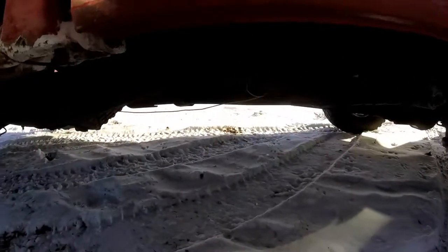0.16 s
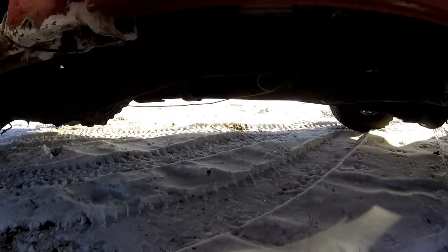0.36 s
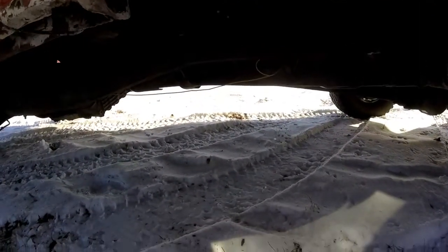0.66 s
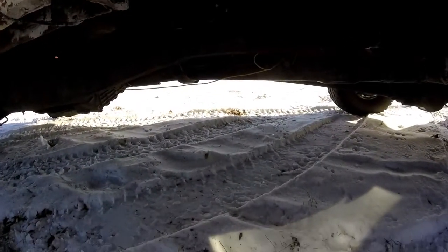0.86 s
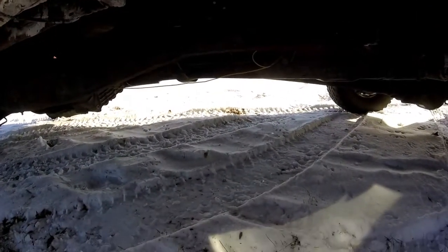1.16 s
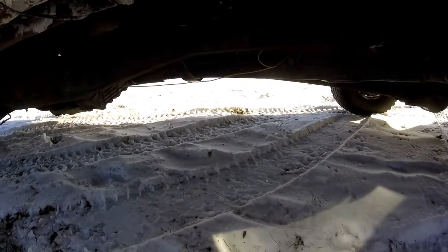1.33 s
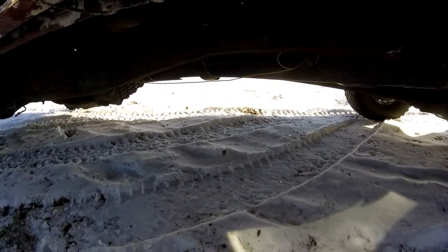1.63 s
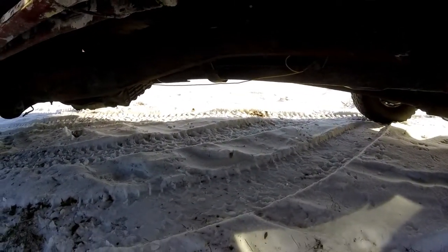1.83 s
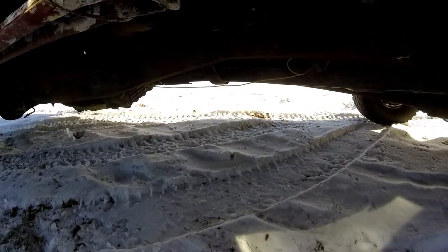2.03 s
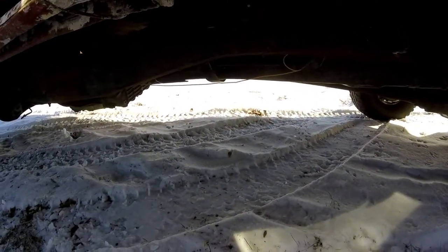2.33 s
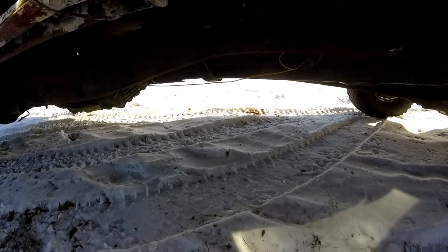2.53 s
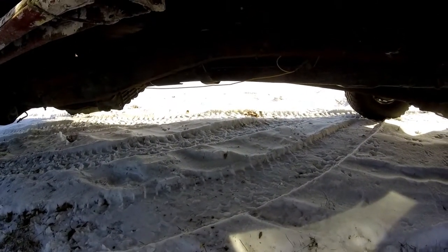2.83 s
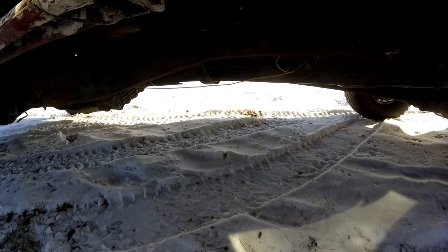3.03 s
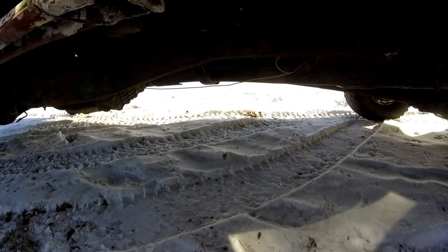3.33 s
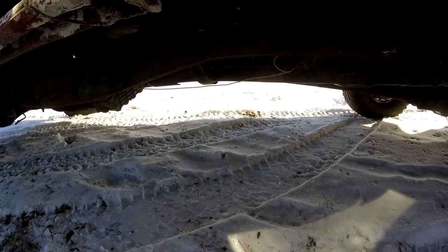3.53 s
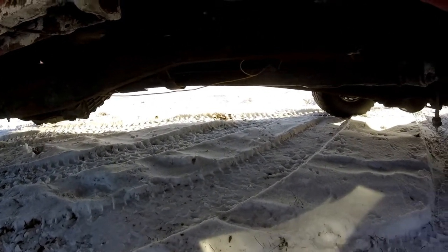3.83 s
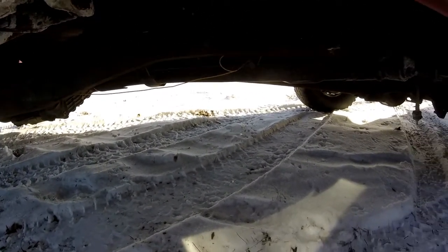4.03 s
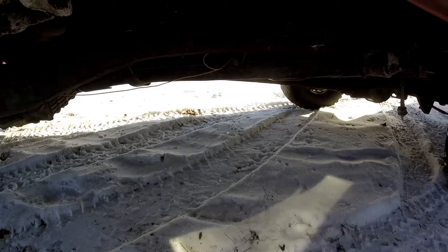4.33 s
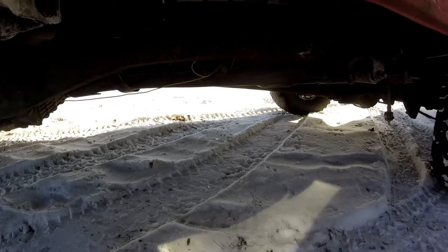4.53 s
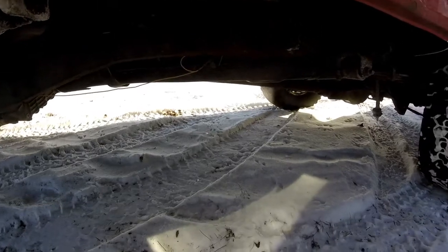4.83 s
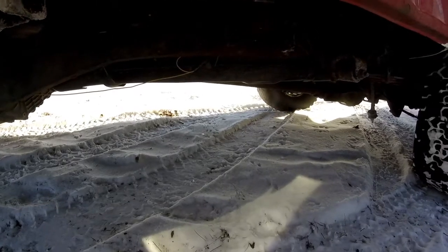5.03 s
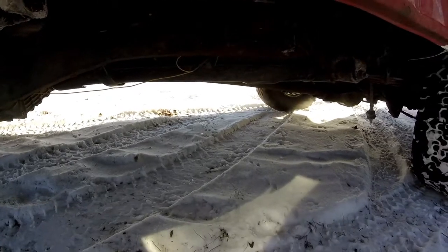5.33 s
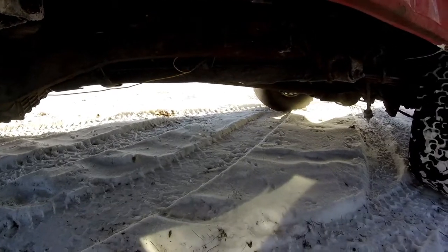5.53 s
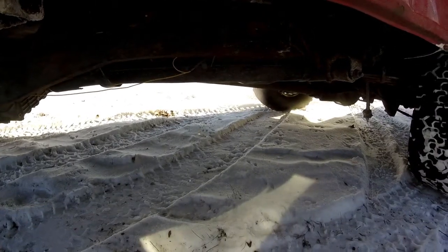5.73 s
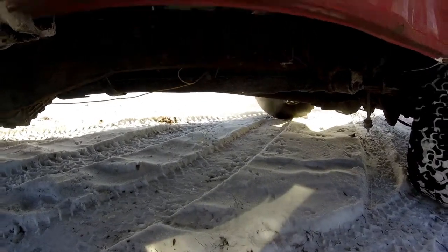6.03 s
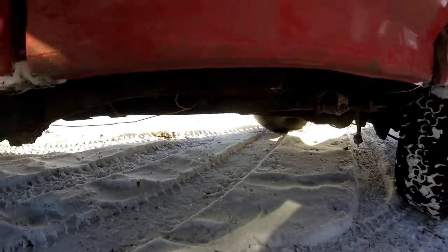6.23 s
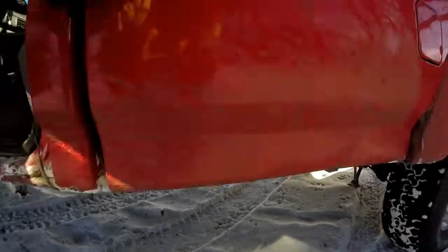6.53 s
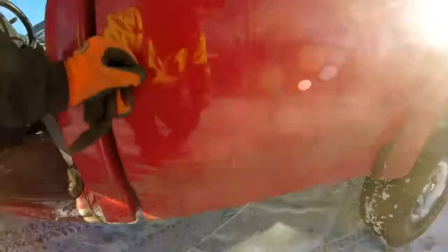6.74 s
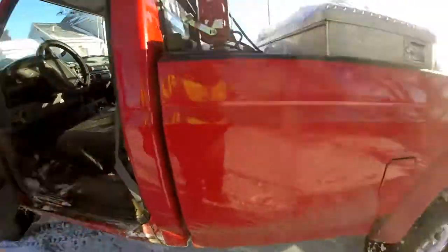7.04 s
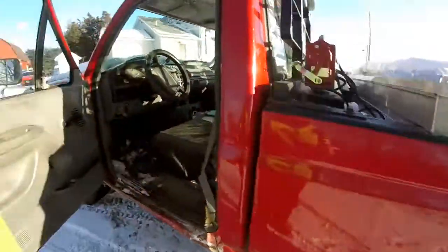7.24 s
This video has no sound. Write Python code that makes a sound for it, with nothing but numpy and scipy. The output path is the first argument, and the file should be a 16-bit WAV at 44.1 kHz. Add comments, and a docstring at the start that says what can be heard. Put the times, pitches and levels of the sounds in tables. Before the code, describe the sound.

Loud, unmuffled truck engine idling close by, starting quick and raspy, then easing into a deep, lumpy drone.

```python
"""A V8 pickup with open pipes idles on snow, heard from under its side. It starts at a fast idle: two
banks of cylinders puff unevenly into ringing pipes and gas rasps with each puff, over a hissing fan, a
whining alternator, a thin electric buzz and rattling metal. After a second the idle starts to settle.
Clothes scuff now and then, and snow squeaks, mostly between four and five seconds. Near the end the
microphone rises past the body panel, which briefly shades and reflects the exhaust."""
import sys
import numpy as np
from scipy import signal
from scipy.fft import rfft, irfft
from scipy.io import wavfile
from scipy.ndimage import map_coordinates

SR = 44100
rng = np.random.default_rng(int(sys.argv[2]) if len(sys.argv) > 2 else 0)


def digitize_waveform(pressure):
    """Quantize a signal to 16-bit integers and store it at the path in sys.argv[1].

    Rows of a 2-D input are taken as channels; values are limited to [-1, 1].
    """
    field = np.atleast_2d(pressure).T
    bounded = np.clip(field, -1, 1)
    quanta = np.round(bounded * 32767).astype(np.int16)
    wavfile.write(sys.argv[1], SR, quanta)


N = 325261
T = np.arange(N) / SR
HZ = np.maximum(np.fft.rfftfreq(N, 1 / SR), 1e-3)

WARM_HZ, FAST_HZ = 86.7, 93.5  # firings per second at warm idle and at fast idle
SLOWING_S, SLOWING_HALF_S = 1.6, 0.49  # the falling revs pass through the pipes' growl
SAG_S, SAG_HALF_S = 2.16, 0.45  # the exhaust softens as the idle comes down
RISE_S, RISE_LENGTH_S = 6.37, 1.2  # the microphone rises from under the truck
SHADE_S, SHADE_HALF_S = 7, 0.25  # on the way the body panel shades it

# Snow squeaking underfoot: (time [s], half-length [s], pitch [Hz], level [dB])
SNOW_SQUEAKS = [(0.858, .02, 3900, -59), (4.158, 0.048, 1400, -42), (4.657, .066, 2100, -47),
                (4.863, .05, 2420, -51)]
# Clothes brushing near the microphone: (time [s], half-length [s], level [dB])
CLOTHES_SCUFFS = [(0.087, 0.033, -45.5), (0.198, .13, -52), (3.263, 0.25, -55), (5.042, 0.095, -52),
                  (6.263, 0.029, -51.5), (6.685, 0.38, -54.5)]
# Loose metal parts: (pitch [Hz], band width [Hz], level at warm idle [dB])
LOOSE_PARTS = [(2050, 260, -56.5), (3690, 800, -66.5)]
# Tone colour of the electric buzz: (frequency [Hz], relative level [dB])
BUZZ_SPECTRUM = [(2500, -39), (4300, -11), (5100, -5), (5450, -4), (5750, -2), (6050, 2), (6350, -7.5),
                 (6750, -7), (7600, -23), (8500, -22.5), (9300, -21), (10700, -15.5), (12500, -25.5),
                 (15000, -32)]
# Reflections of the buzz: (delay under the truck [ms], extra delay once risen [ms], gain [factor])
BUZZ_ECHOES = [(1.8, 2.7, 0.42), (3.1, -0.94, 0.33)]
# Loudness of the alternator: (time [s], level [dB])
WHINE_LEVEL = [(0, -59), (2.1, -51.5), (2.8, -57), (6.2, -54), (6.5, -72)]
# Tone colour of the engine bay's hiss: (frequency [Hz], relative level [dB])
BAY_SPECTRUM = [(300, -16), (1200, 3.5), (1550, 7), (1800, 10.5), (2050, 12.5), (2350, 2), (2700, -2),
                (3600, -1.5), (4400, -6.5), (6000, -5), (8000, -10), (9500, -15.5), (12000, -27),
                (15000, -35)]
# Tone colour of the rushing gas: (frequency [Hz], relative level [dB])
GAS_SPECTRUM = [(25, -22), (55, -9.5), (150, -9.5), (300, -3.5), (380, -6), (480, 0.5), (540, -8.5),
                (650, -6.5), (780, 1.5), (890, -2.5), (990, -13.5), (1100, -17.5), (1450, -23.5),
                (4000, -65.5)]
# Engine speed, a fast idle that settles: (time [s], firing rate [Hz])
FIRING_RATE = [(0, 93.53), (0.9, 93.46), (2.85, 86.23), (4.6, 86.63), (6.2, 86.67), (7.38, 86.01)]
# One engine cycle in firing order: (bank [0 or 1], travel time to the pipe mouth [ms], strength [dB])
CYLINDER_PUFFS = [(0, 1.427, 5), (0, 1.68, 5.5), (1, 3.27, 6.5), (0, 1.925, 3.5), (1, 4.012, 9),
                  (1, 4.005, 0.1), (0, 1.42, 3.5), (1, 3.36, 5)]
# The notes the pipes ring at, and how each bank drives them: (pitch [Hz], band width [Hz],
# bank 0 weight [signed factor], bank 1 weight [signed factor], extra at fast idle [dB])
PIPE_RESONANCES = [(56, 12, 0.021, 0.087, 5), (85.07, 6.8, 0.21, -0.17, 7.5),
                   (104.4, 9.3, -0.067, 0.48, 3.5), (154.2, 45.5, -0.066, 0.0133, 11.5),
                   (176.17, 12.3, 0.26, -0.2092, 6), (226.8, 7.5, 0.008, -0.0225, 15),
                   (293.1, 16.06, 0.21, -0.18, -0.8), (316.2, 13.5, -0.13, 0.023, 4.5),
                   (391, 31, -0.0051, 0.0079, 0.5), (429.6, 14, -0.0217, -0.0157, 12.5),
                   (465, 15.7, -0.0011, -0.063, 7.5), (486.2, 5, 0.092, 0.048, 5),
                   (572, 10, -0.0023, -0.0021, 19), (626, 3.8, 0.014, 0.018, -2.5),
                   (654, 12, -0.0074, -0.004, 14.5), (738, 27, -0.0155, -0.0062, 6.5),
                   (813.5, 7.0, 0.015, 0.0114, 12.5), (882, 51, 0.0013, 0.0119, 2.5),
                   (979, 45, 0.0023, -0.0057, 1)]
# The pipes' pitch ranges, low to high: boom, drone, growl, bark, blare (name [text])
RANGE_NAMES = ["boom", "drone", "growl", "bark", "blare"]
# Borders between those ranges: (frequency [Hz])
RANGE_BORDERS = [140, 220, 380, 540]
# Gain of each range, the rasp and the bay: (at warm idle [dB], extra at fast idle [dB],
# extra while slowing [dB], extra in the sag [dB], extra once risen [dB], extra in the shade [dB])
LAYER_GAINS = {"boom": (-0.25, -3.7, -1.5, -1.5, -3, -3.5),
               "drone": (-0.44, -0.24, 0.86, -0.98, -0.38, -0.6), "growl": (-1, -0.6, 1.5, -2.9, -1, -2),
               "bark": (0, -2.5, 0.5, -4.5, -2.5, -7), "blare": (-0.4, 1.3, -6.5, 2, -7.5, -5.5),
               "rasp": (-30, 6.5, 0.5, -1, -5, 0), "bay": (-49, 5, -0.5, -1.5, -0.5, -2.5)}
# Bark and blare surge once per engine cycle:
# (depth [dB], extra at fast idle [dB], strongest at [firing number], later at fast idle [firings])
CYCLE_SURGES = {"bark": (1.6, 1.7, 5.38, 3.24), "blare": (0.5, 4, 7.5, -0.5)}


def undb(db):
    """Turn decibels into a gain factor."""
    return 10 ** (np.asarray(db) / 20)


def unit(x):
    """Scale a sound to an average strength (rms) of 1."""
    return x / np.sqrt(np.mean(x ** 2))


def curve(table):
    """Join (time, value) points with straight lines."""
    return np.interp(T, *np.transpose(table))


def swell(time_s, half_s):
    """A smooth bump of height 1 at time_s, down to about a third half_s to either side."""
    return np.exp(-((T - time_s) / half_s) ** 2)


def resonance(hz, width_hz):
    """How something that rings at one pitch responds to each frequency; gain 1 at that pitch."""
    return 1 / (1 + 1j * (HZ ** 2 - hz ** 2) / (HZ * width_hz))


def colour(x, spectrum):
    """Filter a sound by a curve of (Hz, dB) points; rms 1."""
    hz, db = np.transpose(spectrum)
    gain = undb(np.interp(np.log(HZ), np.log(hz), db))
    return unit(irfft(rfft(x) * gain, N))


def clicks(times, sizes):
    """Sharp clicks, each spread over 16 samples so that it can fall between two of them."""
    out = np.zeros(N)
    taps = np.floor(times * SR)[:, None] + np.arange(-7, 9)
    away = taps - times[:, None] * SR
    shapes = np.sinc(away) * np.cos(np.pi * away / 16) ** 2
    np.add.at(out, taps.astype(int) % N, sizes[:, None] * shapes)
    return out


def beats(count):
    """Number and time of each event, from a running count of events."""
    number = np.arange(int(count[-1]))
    return number, np.interp(number, count, T)


def delayed(x, lag_ms):
    """A sound heard late, by a delay that may change."""
    return map_coordinates(x, [(T - lag_ms / 1000) * SR], order=3)


def fast_idle():
    """How fast the engine idles, from 0 (warm idle) to 1 (fast idle)."""
    return np.clip((curve(FIRING_RATE) - WARM_HZ) / (FAST_HZ - WARM_HZ), 0, 1) ** 1.15


def risen():
    """How far the microphone has risen, from 0 to 1."""
    return np.clip((T - RISE_S) / RISE_LENGTH_S, 0, 1)


def shaded():
    """How much the body panel shades the microphone, from 0 to 1."""
    return swell(SHADE_S, SHADE_HALF_S)


def layer_db(layer):
    """A layer's gain follows the idle and the place of the microphone."""
    warm, fast, slowing, sag, up, shade = LAYER_GAINS[layer]
    settling = slowing * swell(SLOWING_S, SLOWING_HALF_S) + sag * swell(SAG_S, SAG_HALF_S)
    return warm + fast * fast_idle() + settling + up * risen() + shade * shaded()


def friction(hz, width_hz, grain_db):
    """Rubbing: a band of noise made gritty by a new random strength every 64 samples; rms 1."""
    grit = np.repeat(undb(grain_db * rng.standard_normal(N // 64 + 1)), 64)[:N]
    rubbing = grit * rng.standard_normal(N)
    return unit(irfft(rfft(rubbing) * resonance(hz, width_hz) ** 2, N))


def snow_squeaks():
    """Packed snow rubs in a narrow band of pitch."""
    return sum(undb(db) * swell(time_s, half_s) ** 2 * friction(hz, 0.16 * hz, grain_db=4)
               for time_s, half_s, hz, db in SNOW_SQUEAKS)


def clothes_scuffs():
    """Clothes brush in short, crackling swells."""
    pressure = sum(undb(db) * swell(time_s, half_s) ** 2 for time_s, half_s, db in CLOTHES_SCUFFS)
    return pressure * friction(hz=5700, width_hz=3900, grain_db=5.5)


def metal_rattles(count, chance=22 / WARM_HZ, scatter_db=3, fast_db=4.5):
    """Now and then a firing shakes a loose part into a short ring, harder at fast idle."""
    _, times = beats(count)
    out = 0
    for hz, width, db in LOOSE_PARTS:
        shaken = rng.random(len(times)) < chance
        sizes = shaken * undb(scatter_db * rng.standard_normal(len(times)))
        ringing = irfft(rfft(clicks(times, sizes)) * resonance(hz, width) ** 2, N)
        out = out + undb(db) * unit(ringing)
    shade_db = LAYER_GAINS["bay"][-1]
    return out * undb(fast_db * fast_idle() + shade_db * shaded())


def hand_sway(hz=1.3):
    """The hand holding the microphone drifts slowly at random; rms 1."""
    return unit(irfft(rfft(rng.standard_normal(N)) * np.exp(-(HZ / hz) ** 2), N))


def electric_buzz(pulse_hz=183.62, steady_from_s=2.5, limp=0.55, ring_s=0.013, sway_ms=0.07):
    """Sharp electric pulses ring a small housing; at first they waver and alternate strong and weak."""
    waver = 0.003 * (T < steady_from_s) * np.cos(2 * np.pi * 2.55 * (T - 0.15))
    number, times = beats(np.cumsum(pulse_hz * (1 + waver)) / SR)
    pulses = clicks(times, 1 + limp * (times < steady_from_s) * (-1) ** number)
    housing = rng.standard_normal(N) * np.exp(-T / ring_s)
    smear = np.exp(1j * np.angle(rfft(housing)))  # the housing spreads each pulse out in time
    direct = colour(irfft(rfft(pulses) * smear, N), BUZZ_SPECTRUM)
    # echoes weaken some overtones; which ones changes as the microphone moves
    up, heard = risen(), direct
    for lag_ms, extra_ms, gain in BUZZ_ECHOES:
        heard = heard + gain * delayed(direct, lag_ms + extra_ms * up + sway_ms * hand_sway())
    level_db = -53 + 2 * fast_idle() + 1.5 * up
    return undb(level_db) * unit(heard)


def alternator(count, waves_per_firing=20.8):
    """The alternator whines with a thin tone that follows the engine speed."""
    return undb(curve(WHINE_LEVEL)) * unit(np.sin(2 * np.pi * waves_per_firing * count))


def engine_bay(count, tick=0.21, fade_firings=0.23, scatter_db=4):
    """Fan and belts hiss; the valve gear adds a soft, uneven tick for every firing."""
    strengths = undb(scatter_db * rng.standard_normal(int(count[-1]) + 1))
    ticks = tick * strengths[count.astype(int)] * np.exp(-(count % 1) / fade_firings)
    hiss = colour((1 + ticks) * rng.standard_normal(N), BAY_SPECTRUM)
    return undb(layer_db("bay") + 1.5) * hiss


def gas_flow(banks, count, fade_s=0.014, surge_db=2.5, peak_firing=6):
    """Gas leaves in a fading gust after every firing and surges once per engine cycle; average 1."""
    gusts = signal.lfilter([1], [1, -np.exp(-1 / (fade_s * SR))], sum(banks))
    surge = np.cos(2 * np.pi * (count - peak_firing) / len(CYLINDER_PUFFS))
    flow = gusts * undb(surge_db * surge)
    return flow / flow.mean()


def gas_rasp(flow, ringing=0.72, width_hz=14):
    """Swirling gas at the pipe mouth follows the flow and sings a little at the pipes' upper notes."""
    turbulence = rfft((1 + flow) * rng.standard_normal(N))
    upper_notes = sum(resonance(hz, width_hz) for hz, *_ in PIPE_RESONANCES if hz > RANGE_BORDERS[1])
    singing = irfft(turbulence * (1 + ringing * upper_notes), N)
    return undb(layer_db("rasp")) * colour(singing, GAS_SPECTRUM)


def past_panel(x, gain=0.34, passing_lag_ms=1.21, closing_ms_per_s=1.6):
    """The body panel adds an echo; its delay shrinks, so a dip in the tone sweeps upward."""
    lag_ms = np.maximum(passing_lag_ms - closing_ms_per_s * (T - SHADE_S), 0)
    return x + gain * shaded() * delayed(x, lag_ms)


def cylinder_puffs(count, scatter_db=0.5, jitter_ms=0.045):
    """The puffs of each bank: every cylinder has its own strength and delay, and no two burns match."""
    number, fired_s = beats(count)
    bank, lag_ms, db = np.array(CYLINDER_PUFFS)[number % len(CYLINDER_PUFFS)].T
    time_luck, size_luck = rng.standard_normal((len(number), 2)).T
    times = fired_s + (lag_ms + jitter_ms * time_luck) / 1000
    sizes = undb(db + scatter_db * size_luck)
    return [clicks(times, sizes * (bank == side)) for side in range(2)]


def cycle_surge_db(name, count):
    """The pipes' upper ranges grow louder and softer once per engine cycle."""
    if name not in CYCLE_SURGES:
        return 0
    depth, fast_depth, peak_firing, fast_shift = CYCLE_SURGES[name]
    fast = fast_idle()
    cycles = (count - peak_firing - fast_shift * fast) / len(CYLINDER_PUFFS)
    return (depth + fast_depth * fast) * np.cos(2 * np.pi * cycles)


def exhaust(banks, count, gain_db=47.5, soften_hz=1100):
    """The puffs of both banks make the pipes ring, hardest at fast idle."""
    fast = fast_idle()
    rounded = 1 / (1 + (HZ / soften_hz) ** 8)  # a valve opens gradually, so its puff has no sharp edge
    puffs_0, puffs_1 = (rfft(bank) * rounded for bank in banks)
    out = 0
    for index, name in enumerate(RANGE_NAMES):
        settled = racing = 0
        for hz, width, weight_0, weight_1, fast_db in PIPE_RESONANCES:
            if np.digitize(hz, RANGE_BORDERS) == index:
                ring = resonance(hz, width) * (weight_0 * puffs_0 + weight_1 * puffs_1)
                settled = settled + ring
                racing = racing + undb(fast_db) * ring
        blend = fast * irfft(racing, N) + (1 - fast) * irfft(settled, N)
        out = out + undb(gain_db + layer_db(name) + cycle_surge_db(name, count)) * blend
    return out


def scene():
    """One crankshaft times the exhaust, ticks, whine and rattles; buzz, clothes and snow join in."""
    count = np.cumsum(curve(FIRING_RATE)) / SR  # firings so far
    banks = cylinder_puffs(count)
    pipes = past_panel(exhaust(banks, count)) + gas_rasp(gas_flow(banks, count))
    bay = engine_bay(count) + alternator(count) + electric_buzz()
    return (pipes + bay + clothes_scuffs() + snow_squeaks() + metal_rattles(count))[None]


def record(dry):
    """The highest treble is cut away."""
    top_hz = 15700
    return signal.sosfilt(signal.ellip(8, 0.2, 70, top_hz, fs=SR, output="sos"), dry)


dry = scene()
out = record(dry)
digitize_waveform(out)
```